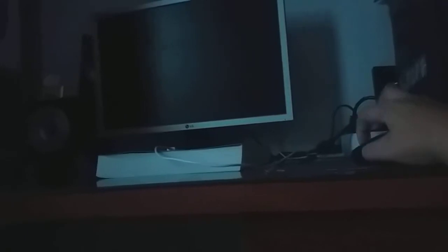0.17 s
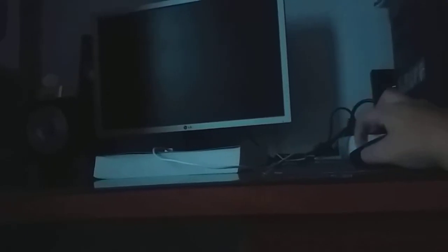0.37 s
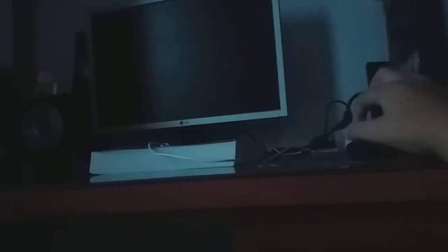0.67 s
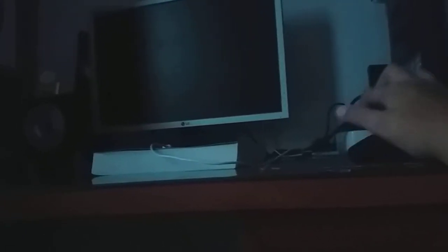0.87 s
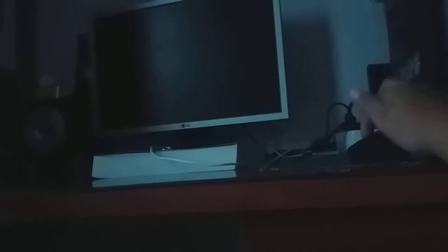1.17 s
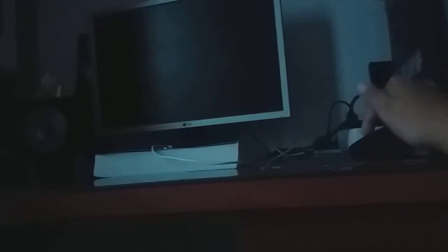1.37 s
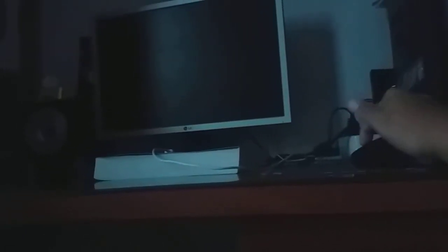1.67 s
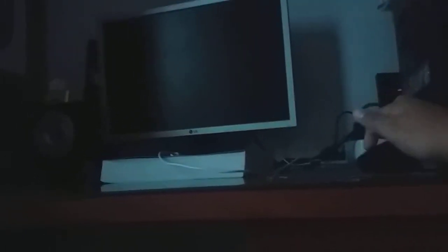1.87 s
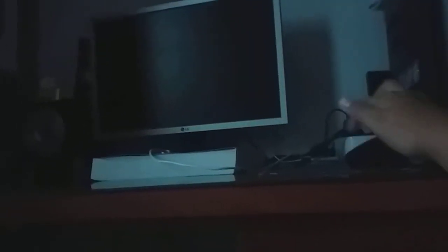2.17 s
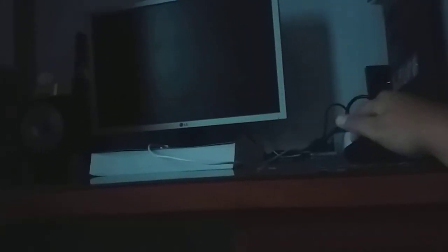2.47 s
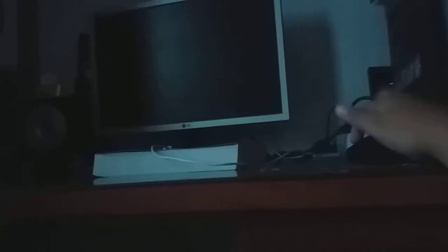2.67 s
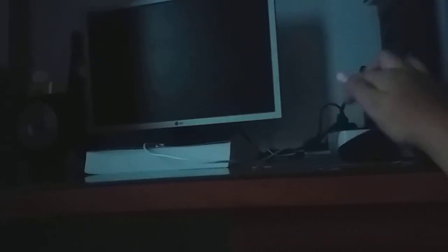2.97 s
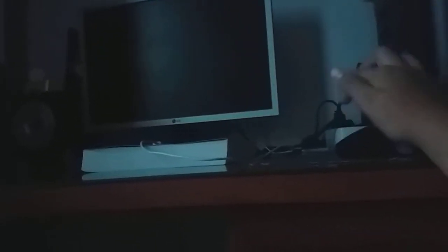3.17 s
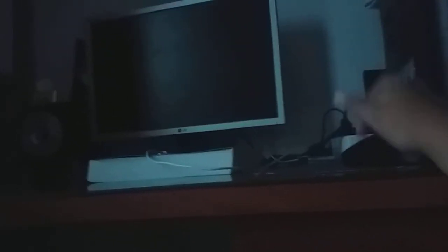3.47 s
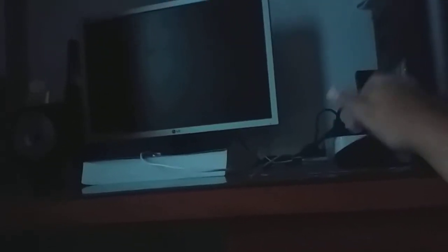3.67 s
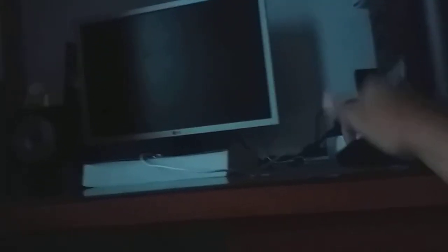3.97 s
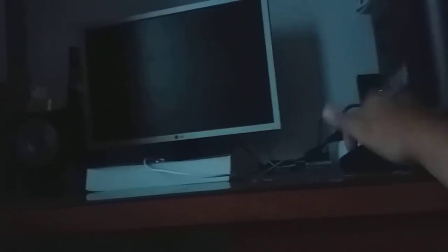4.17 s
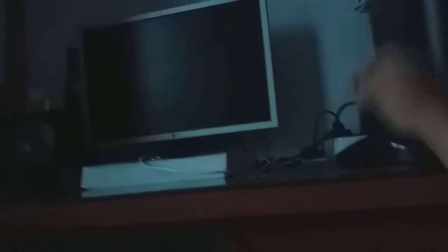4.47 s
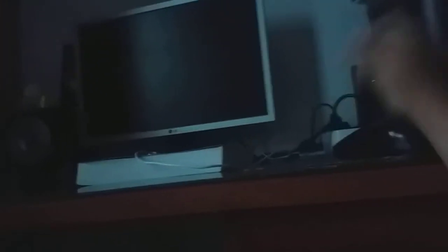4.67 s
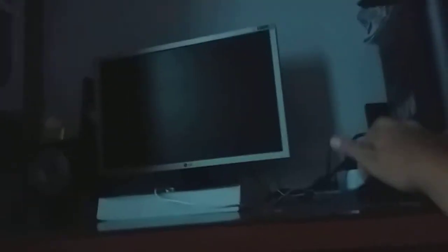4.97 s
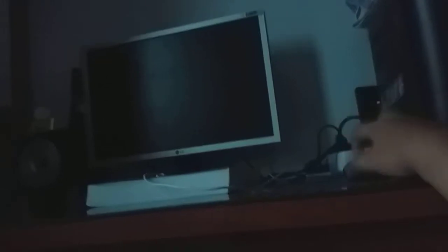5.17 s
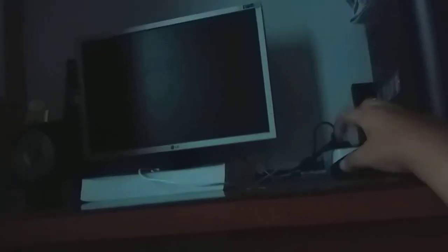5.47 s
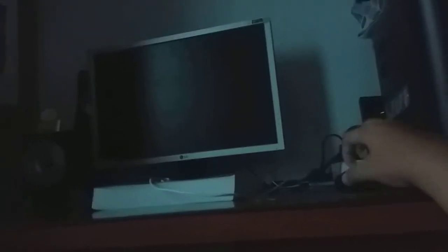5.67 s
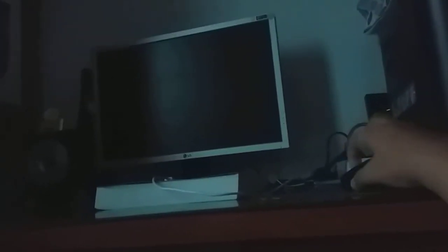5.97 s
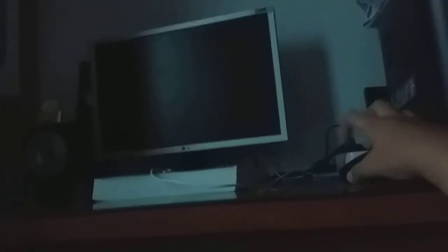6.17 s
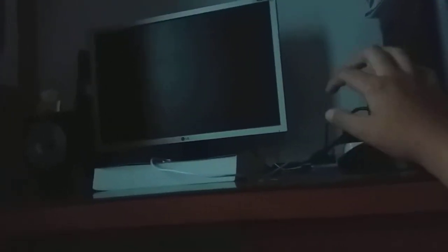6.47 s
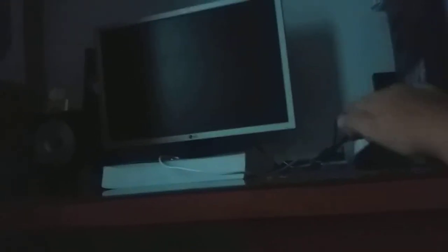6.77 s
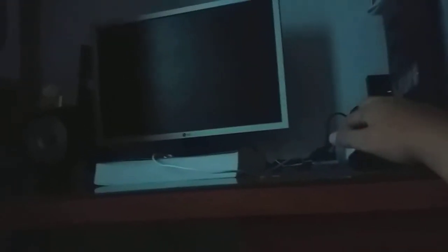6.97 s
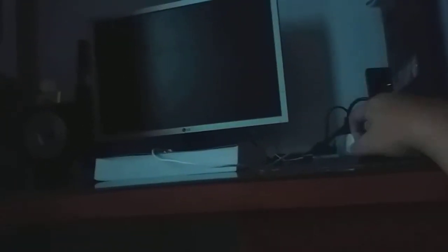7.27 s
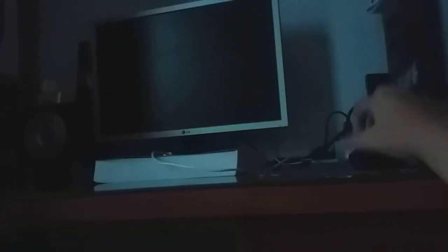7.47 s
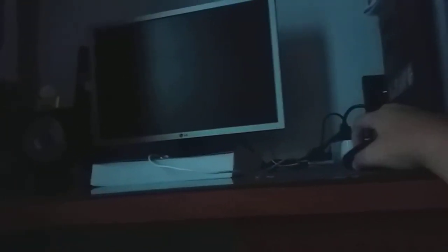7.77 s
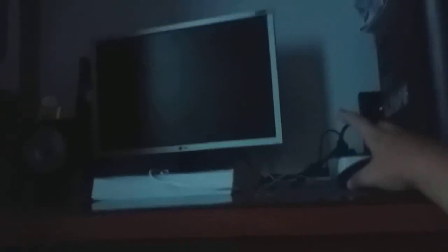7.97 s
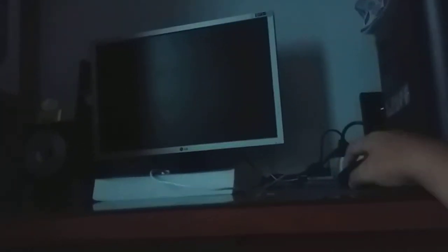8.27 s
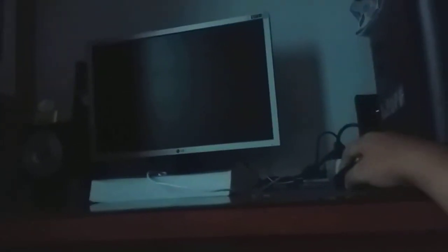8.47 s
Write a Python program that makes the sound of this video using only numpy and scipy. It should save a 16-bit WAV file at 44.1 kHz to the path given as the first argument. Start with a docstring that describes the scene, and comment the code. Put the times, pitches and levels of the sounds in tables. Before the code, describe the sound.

Close in a small bare room, a finger clicks a computer mouse on a wooden desk. Light, uneven taps with tiny release ticks run about five per second, grow steadily harder, then break into loud, wider-spaced clacks with stray hand knocks. A few dull low bumps fall between. A phone picks it up over faint steady hiss, with a very thin tone at the start.

```python
"""A finger clicks a computer mouse on a wooden desk: gentle, uneven taps in a quick run, under a thin tone that dies away.
The run grows harder, then breaks up into hard blows further apart, with stray knocks of the hand between them.
Filtered contact noise and decaying sines make each tap: desk, shell, button, crack and spring; many releases tick too.
A few soft low bumps fall in between, built from low struck modes.
A small bare room answers in noise and standing waves; a phone hears it all over a faint, steady hiss."""
import sys
import numpy as np
from scipy import signal
from scipy.fft import rfft, irfft
from scipy.io import wavfile

SR = 44100
rng = np.random.default_rng(int(sys.argv[2]) if len(sys.argv) > 2 else 0)


def int16_out(signal):
    """Quantize to a 16-bit WAV file."""
    q = np.round(np.clip(np.atleast_2d(signal).T, -1, 1) * 32767)
    wavfile.write(sys.argv[1], SR, q.astype(np.int16))


N = 380141  # length in samples
T = np.arange(int(.16 * SR)) / SR  # time axis of one short sound, s


def amp(db):
    """Decibels to gain."""
    return 10 ** (np.asarray(db) / 20)


def read(points, hz):
    """Join (Hz, value) points on a log-frequency axis."""
    f, value = np.transpose(points)
    return np.interp(np.log(np.maximum(hz, 1)), np.log(f), value)


def bins(x):
    """Frequencies of the spectrum of x."""
    return np.fft.rfftfreq(len(x), 1 / SR)


def colour(x, points):
    """Shape x by a (Hz, dB) spectrum."""
    return irfft(rfft(x) * amp(read(points, bins(x))), len(x))


def burst(x, db):
    """Give a short sound the energy of 10 ms at this RMS level."""
    rms_over_10ms = np.sqrt(np.sum(x ** 2) * 100 / SR)
    return x * amp(db) / rms_over_10ms


def add(out, s, x):
    """Mix x into out at time s."""
    i = max(int(s * SR), 0)
    room_left = max(len(out) - i, 0)
    out[i:i + len(x)] += x[:room_left]


def fade(t, t60):
    """Exponential decay, 60 dB in t60 seconds."""
    return np.exp(-np.log(1000) * t / t60)


def resonances(table, scatter_db, detune):
    """Power response of a few damped resonances; the finger loads them differently at every touch."""
    hz, width, db = np.transpose(table)[:, :, None]
    size, shift = rng.standard_normal((2, len(table), 1))
    hz = hz * (1 + detune * shift)
    db = db + scatter_db * size
    f = np.maximum(bins(T), 1)
    off_centre = (f ** 2 - hz ** 2) / (f * width)
    return np.sum(amp(db) ** 2 / (1 + off_centre ** 2), axis=0)


def strike(parts, t60):
    """A contact that chatters for a few ms, heard through parts given as (power response, dB)."""
    power = sum(amp(db) ** 2 * response / response.mean() for response, db in parts)
    chatter_phase = np.angle(rfft(rng.standard_normal(len(T)) * fade(T, t60)))
    # folding the cepstrum makes the body ring after the blow, never before it
    cepstrum = irfft(np.log(power) / 2, len(T))
    cepstrum[1:] *= 2 * (T[1:] < T[-1] / 2)
    body = np.exp(rfft(cepstrum) + 1j * chatter_phase)
    sound = irfft(body, len(T))[:len(T) // 2]
    return burst(sound, 10 * np.log10(power.mean()))


def ring(modes, scatter_db, detune, contact_s):
    """Struck modes; every blow lands on a slightly different spot and takes contact_s to build up."""
    hz, db, t60 = np.transpose(modes)[:, :, None]
    size, shift, phase = rng.standard_normal((3, len(modes), 1))
    waves = np.sin(2 * np.pi * (hz * (1 + detune * shift) * T + phase))
    mix = np.sum(amp(db + scatter_db * size) * fade(T, t60) * waves, axis=0)
    return mix * (1 - np.exp(-(T / contact_s) ** 2))


# Spectrum of the plastic crack. Each row: frequency in Hz, level in dB.
CRACK_SPECTRUM = [(300, -18.5), (1500, 6), (3300, 2), (4400, 0.5), (5500, 4), (7000, 6.5), (8500, 3.5),
                  (10000, 0), (11200, 1.5), (13000, -1), (15500, -3)]


def crack():
    """Power response of plastic meeting plastic: a dense cluster of high modes."""
    return amp(read(CRACK_SPECTRUM, bins(T))) ** 2


# Broad resonances of desk top, plastic shell and button.
# Each row: frequency in Hz, width in Hz, relative level in dB.
DESK_RESONANCES = [(311.5, 38, 3), (474, 99, 2.5)]
SHELL_RESONANCES = [(743, 130, -1.5), (797, 146, 1), (994, 78, -5), (1328, 57, -1.5), (1578, 104, 0.5)]
BUTTON_RESONANCES = [(2122, 150, 4), (2516, 260, -1.5), (3200, 250, -4.5), (3710, 180, -4),
                     (5200, 280, -10), (7170, 220, -14.5)]
# Low boom of the desk. Each row: frequency in Hz, relative level in dB, t60 in seconds.
BOOM_MODES = [(75, -19.5, 0.023), (112, -4, 0.088), (130, 6, 0.034), (183, 4.5, 0.041), (245, -2.5, 0.048)]
BOOM_DB = -4.5  # against the mean of desk and shell levels


def blow(desk_db, shell_db, button_db, crack_db):
    """One blow on the mouse: crack, button and shell sound together and pass it on to the desk."""
    out = np.zeros(2 * len(T))
    tables = (DESK_RESONANCES, SHELL_RESONANCES, BUTTON_RESONANCES)
    bodies = [resonances(table, scatter_db=2.0, detune=0.022) for table in tables] + [crack()]
    levels_db = (desk_db, shell_db, button_db, crack_db)
    # a dull touch with the pad of the finger lasts longer than a sharp one with the nail
    dullness_db = np.clip(shell_db - crack_db, 0, 12)
    touch_s = 0.014 * amp(0.68 * dullness_db)
    add(out, 0, strike(zip(bodies, levels_db), t60=touch_s))
    # the bulk of the desk answers late, with a short low boom
    boom = ring(BOOM_MODES, scatter_db=3.0, detune=0.056, contact_s=0.007)
    add(out, .012, burst(boom, (desk_db + shell_db) / 2 + BOOM_DB))
    return out


# Taps on the button; the weight of the hand behind a tap reaches the desk.
# Each row: start in seconds, force in dB, desk knock in dB above the force.
TAPS_ON_BUTTON = [(0.0264, -56, -6), (.219, -30.5, -14.5), (.427, -52, -6), (0.6035, -41.5, -12),
                  (0.7605, -53, -10), (0.9522, -35, -16.5), (1.1541, -37, -15), (1.332, -42.5, -6),
                  (1.5035, -60, -17), (1.68, -53, -9), (1.8839, -49.5, -2.5), (2.0847, -37, -9),
                  (2.2888, -40.5, -14), (2.4957, -36, -11.5), (2.7067, -44, -1), (2.8905, -28, -19),
                  (3.077, -28.5, -17), (3.267, -29, -19.5), (3.4512, -26, -22.5), (3.6302, -25.5, -18),
                  (3.8063, -35, -12.5), (4.0225, -27.5, -18.5), (4.2075, -26, -15), (4.4528, -20, -15),
                  (4.6335, -20.5, -16.5), (4.845, -21, -7.5), (5.4042, -54, -9), (5.6062, -26, -5.5),
                  (5.816, -33, -12.5), (6.0241, -24, -15.5), (6.2466, -25.5, -15), (6.7327, -22.5, -3.5),
                  (7.2965, -18.5, -10.5), (7.6747, -48, -10), (7.7028, -47.5, -7), (8.1748, -22, -10),
                  (8.498, -24.5, -10.5)]
# Singing modes of the switch spring. Each row: frequency in Hz, relative level in dB, t60 in seconds.
SPRING_MODES = [(7780, -2, .09), (7900, 0, .11), (8040, -1, .11), (8200, -2, .1)]
# A firm finger stays on the button and damps the spring. Each row: force in dB, change of spring level in dB.
SPRING_DAMPING_BY_FORCE = [(-43, -1.5), (-32, -6)]
# the contact crack grows more slowly than the force: level at a middling tap, and dB per dB of force
MIDDLING_DB, CRACK_DB, CRACK_GROWTH = -30, -30.5, 0.8
# the switch trips at its own fixed force, so its tick is alike however hard the tap; spring before damping
TICK_DB, SPRING_DB = -48.5, -44.5
# a light tap stirs mostly the button, a firm one the whole shell:
# button over shell in dB at a middling tap, and dB per dB of force
BUTTON_LEAD_DB, BUTTON_LEAD_SLOPE = .5, -.1


def presses():
    """The button slams shut with the force of the finger; the switch ticks and its spring sings on."""
    out = np.zeros(N)
    for s, force_db, desk_db in TAPS_ON_BUTTON:
        above_middling_db = force_db - MIDDLING_DB
        contact_db = CRACK_DB + CRACK_GROWTH * above_middling_db
        # contact and switch tick add up as powers
        crack_db = 20 * np.log10(np.hypot(amp(contact_db), amp(TICK_DB)))
        spring_db = SPRING_DB + np.interp(force_db, *np.transpose(SPRING_DAMPING_BY_FORCE))
        lead_db = BUTTON_LEAD_DB + BUTTON_LEAD_SLOPE * above_middling_db
        add(out, s, blow(force_db + desk_db, force_db - lead_db / 2, force_db + lead_db / 2, crack_db))
        spring = ring(SPRING_MODES, scatter_db=5.0, detune=0.0011, contact_s=0.00021)
        add(out, s, burst(spring, spring_db))
    return out


# Moments when the switch springs back. Each entry: start in seconds.
RELEASE_TIMES = [0.0793, .3188, 0.4993, .671, 0.831, 1.0347, 1.2238, 1.4136, 1.5746, 1.7688, 1.9524, 2.161,
                 2.3754, 2.578, 2.748, 5.0087, 5.4709, 5.7175, 5.912, 6.144, 6.988, 7.465, 8.3295]
# Resonances of the returning switch. Each row: frequency in Hz, width in Hz, relative level in dB.
RETURN_RESONANCES = [(780, 140, 5), (2230, 770, 2), (3710, 370, 2), (7950, 1400, -2), (12640, 600, -2),
                     (14250, 800, -2), (15400, 600, -8)]
RELEASE_DB = -47


def releases():
    """The switch snaps back with a thinner, higher tick."""
    out = np.zeros(N)
    plastic = crack()
    for s in RELEASE_TIMES:
        switch = resonances(RETURN_RESONANCES, scatter_db=2.0, detune=.012)
        add(out, s, strike([(switch, RELEASE_DB), (plastic, RELEASE_DB - 15)], t60=0.017))
    return out


# The hand knocks the mouse without tripping the switch.
# Each row: start in seconds, level in dB, hardness of the contact in dB.
HAND_KNOCKS = [(5.033, -45, -0.5), (5.2181, -41, 2.5), (6.4091, -38, -5.5), (7.0092, -44, 17.5),
               (7.5304, -36.5, 0.5), (7.683, -45, 14), (7.8565, -65.5, -1), (8.0062, -62.5, -3)]
# How desk, shell, button and crack, in that order, answer a knock.
# Each row: dB above the knock's level, dB per dB of hardness.
KNOCK_ANSWERS = [(-6, -1.87), (0.5, -0.61), (-1, 0.4133), (-8.5, 0.32)]


def knocks():
    """Stray knocks of the hand: soft ones thud into the desk, hard ones clack on the button."""
    out = np.zeros(N)
    part_db, slope = np.transpose(KNOCK_ANSWERS)
    for s, db, hardness_db in HAND_KNOCKS:
        levels_db = db + part_db + slope * hardness_db
        add(out, s, blow(*levels_db))
    return out


# Soft low bumps. Each row: start in seconds, level in dB, tilt of all modes above the lowest in dB.
SOFT_BUMPS = [(.526, -23, 6.5), (2.32, -28.5, 8), (2.557, -35.5, -4), (3.871, -37.5, -2), (4.721, -39, 3.5),
              (5.47, -48, -6), (8.263, -39, -1), (8.595, -37, -10)]
# Modes of a bump. Each row: frequency in Hz, relative level in dB, t60 in seconds.
BUMP_MODES = [(188, 0.5, 0.083), (229.6, -4.5, 0.071), (311, 3, 0.027), (429, -7, 0.039), (542, -5, 0.037),
              (765, -13, 0.03)]


def bumps():
    """Dull bumps: a soft contact stirs low modes and settles with a second push; the tilt sets how dull."""
    out = np.zeros(N)
    for s, db, upper_db in SOFT_BUMPS:
        modes = [(hz, mode_db + upper_db * (k > 0), t60) for k, (hz, mode_db, t60) in enumerate(BUMP_MODES)]
        contact = ring(modes, scatter_db=1.0, detune=0.02, contact_s=0.0034)
        add(out, s, burst(contact, db))
        push = ring(modes, scatter_db=2, detune=.03, contact_s=.003)
        add(out, s + 0.026, burst(push * fade(T, 0.061), db - 11.5))
    return out


# Standing waves of the room. Each row: frequency in Hz, relative level in dB, t60 in seconds.
STANDING_WAVES = [(120.3, -7.5, 0.27), (186, -8.5, 0.52), (243.3, -5, 0.32), (323.8, 3, 0.26),
                  (484, -9, 0.51), (720, -8.5, 0.15), (789, 1, 0.22), (919, -6.5, 0.39), (1027, 1, 0.28),
                  (1270, -7, 0.43), (1540, -3, .28), (2030, -3.5, 0.093)]
# Spectrum of the diffuse tail. Each row: frequency in Hz, level in dB.
TAIL_SPECTRUM = [(40, -5.5), (130, -1.5), (400, 2.5), (900, 3.5), (2000, -1), (4500, 0), (8000, 1),
                 (15000, 1.5)]
# Reverberation time of the tail. Each row: frequency in Hz, t60 in seconds.
TAIL_T60 = [(100, .45), (260, 0.34), (700, 0.29), (1840, 0.33), (4850, .29), (12800, 0.36)]


def room(tail_db, modes_db, echo_db, echo_s, build_s):
    """Response of the room: one early wall echo, a diffuse tail, and standing waves."""
    t = np.arange(SR // 2) / SR
    noise = rfft(colour(rng.standard_normal(len(t)), TAIL_SPECTRUM))
    octave = np.log2(np.clip(bins(t), 2 ** 6, 2 ** 14))
    tail = 0
    # overlapping octave bands, 64 Hz to 16 kHz, each with its own decay
    for k in range(6, 15):
        band = irfft(noise * np.maximum(1 - abs(octave - k), 0), len(t))
        tail = tail + band * fade(t, read(TAIL_T60, 2 ** k))
    waves = 0
    for hz, db, t60 in STANDING_WAVES:
        waves = waves + amp(db) * fade(t, t60) * np.sin(2 * np.pi * (hz * t + rng.random()))
    response = amp(tail_db) * tail / np.linalg.norm(tail) + amp(modes_db) * waves / np.linalg.norm(waves)
    response = response * (1 - np.exp(-(t / build_s) ** 2))
    # the furnished wall scatters its echo over a few milliseconds
    echo = rng.standard_normal(len(T)) * fade(T, 0.0053)
    add(response, echo_s, amp(echo_db) * echo / np.linalg.norm(echo))
    return response


def reverberate(x, count):
    """The hand-held phone drifts, so each stretch of time meets a slightly different room response."""
    out = np.zeros(N)
    for span in np.array_split(np.arange(N), count):
        response = room(tail_db=-0.74, modes_db=-16.5, echo_db=-13.5, echo_s=.008, build_s=.002)
        add(out, span[0] / SR, signal.fftconvolve(x[span], response))
    return out


def thin_tone(hz, width_hz, db, t60):
    """Narrow-band noise: a faint thin tone that wavers, fades and stops after the first second."""
    t = np.arange(SR) / SR
    narrow_band = np.exp(-((bins(t) - hz) / width_hz) ** 2)
    tone = irfft(rfft(rng.standard_normal(SR)) * narrow_band, SR)
    return np.pad(tone / np.std(tone) * amp(db) * fade(t, t60), (0, N - SR))


# Spectrum of the background hiss. Each row: frequency in Hz, relative level in dB.
HISS_SPECTRUM = [(15, -18), (25, -25), (48, -0.5), (114, 12), (317, 3), (384, -2), (624, -0.5), (775, -6),
                 (1130, -5.5), (2280, -10.5), (5000, -19), (7920, -20), (9570, -17.5), (16000, -13.5)]
HISS_DB = -60  # RMS level


def hiss():
    """Faint steady background: coloured noise."""
    x = colour(rng.standard_normal(N), HISS_SPECTRUM)
    return x / np.std(x) * amp(HISS_DB)


def scene():
    """Clicks and bumps, direct and by way of the room, over the thin tone and the hiss."""
    clicks = presses() + releases() + knocks()
    thuds = bumps()
    mid = clicks + thuds + reverberate(clicks + amp(-6.0) * thuds, count=12)
    mid = mid + hiss() + thin_tone(hz=2049, width_hz=9.6, db=-62.5, t60=3.6)
    return np.array([mid, mid])


# Stereo lean of the phone. Each row: frequency in Hz, side signal as a share of the mid (left positive).
STEREO_LEAN = [(1900, -0.0042), (3000, -0.14), (4200, -.36), (5500, -0.54), (7200, -0.35), (8500, 0),
               (10000, .18), (12000, 0.16), (14000, 0)]
CEILING_DB = -.5  # the loudest peaks are rounded off towards this level
TOP_HZ = 16000  # upper edge of the treble


def record(dry):
    """The phone leans presence right and high treble left, cuts deep bass, rounds peaks and cuts the top."""
    side = irfft(rfft(dry[0]) * read(STEREO_LEAN, bins(dry[0])), N)
    bass_cut = signal.butter(2, 50, "highpass", fs=SR, output="sos")
    stereo = signal.sosfilt(bass_cut, dry + np.array([side, -side]))
    stereo = stereo / (1 + (stereo / amp(CEILING_DB)) ** 6) ** (1 / 6)
    treble_cut = signal.ellip(10, .2, 80, TOP_HZ, fs=SR, output="sos")
    return signal.sosfilt(treble_cut, stereo)


dry = scene()
out = record(dry)
int16_out(out)
```